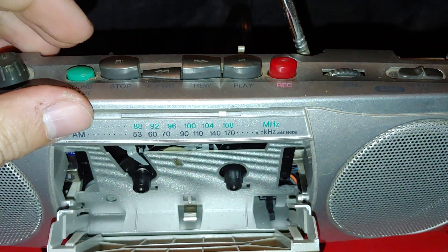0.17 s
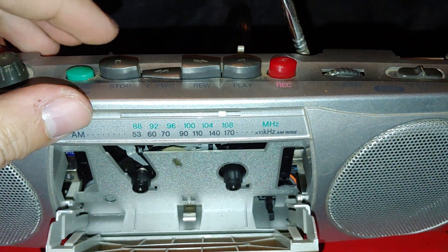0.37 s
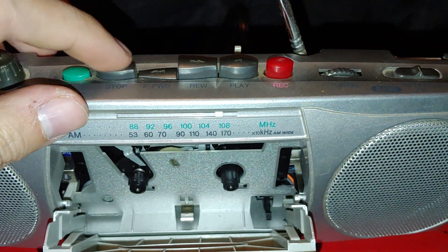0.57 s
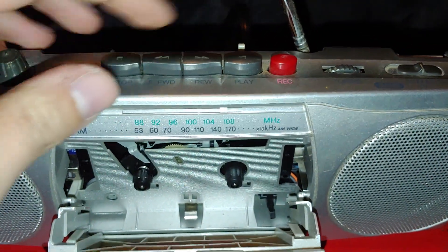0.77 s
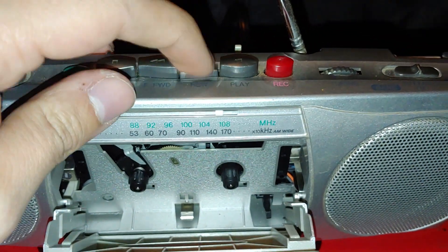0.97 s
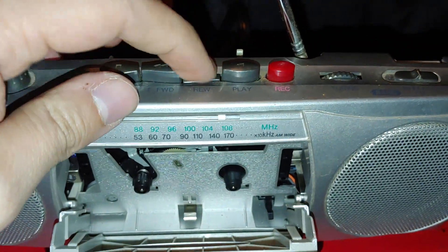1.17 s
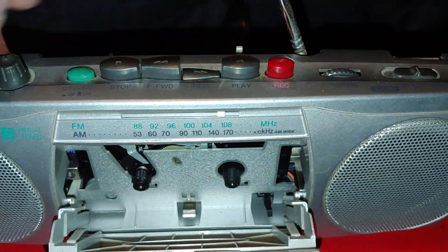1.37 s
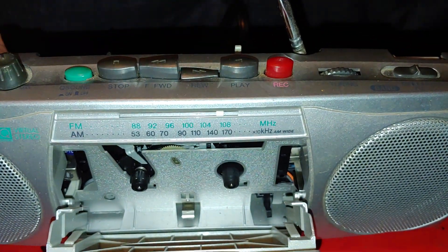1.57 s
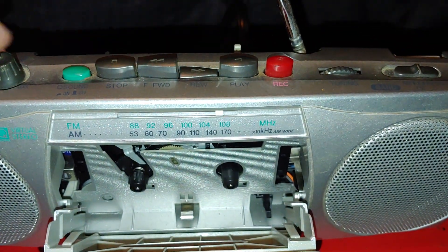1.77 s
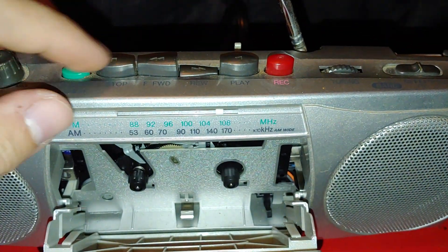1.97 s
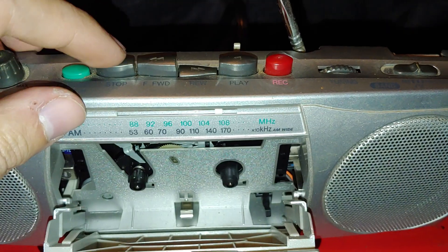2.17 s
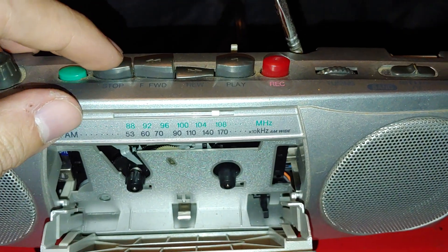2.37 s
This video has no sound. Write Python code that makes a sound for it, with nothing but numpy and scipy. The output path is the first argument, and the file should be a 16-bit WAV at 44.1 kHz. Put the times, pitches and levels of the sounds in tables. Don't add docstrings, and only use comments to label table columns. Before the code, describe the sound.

Cassette player key clicks, close and dry. Quiet hum, mains buzz and soft hiss until a loud bright snap with a low cabinet thump at 0.65 s. A lighter release click follows at 0.8, then a small tick at 1.0 and a heavy clack at 1.06 with rattling and scraping to 1.15. Softer knocks at 1.25 and 1.3, then near quiet, with faint taps around 1.9 and 2.15.

```python
import sys
import numpy as np
from scipy import signal
from scipy.fft import irfft
from scipy.io import wavfile
from scipy.ndimage import uniform_filter1d

SR = 44100
rng = np.random.default_rng(int(sys.argv[2]) if len(sys.argv) > 2 else 0)


def unload_wav(signal):
    wavfile.write(
        sys.argv[1],
        SR,
        np.round(np.clip(np.atleast_2d(signal).T, -1, 1) * 32767).astype(np.int16),
    )


def boost_factor(decibels):
    exponent = np.asarray(decibels, float) / 20
    return 10 ** exponent


N = 106854


def evened(x):
    return x / np.sqrt(np.mean(x ** 2) + 1e-20)


def read(points, hz):
    point_hz, value = np.transpose(points)
    return np.interp(np.log(hz + 1), np.log(point_hz + 1), value)


def add(mix, start_s, sound):
    part = mix[..., round(start_s * SR):][..., :sound.shape[-1]]
    part += sound[..., :part.shape[-1]]


def resonate(x, hz, width_hz):
    b, a = signal.iirpeak(min(hz, SR / 2.2), hz / width_hz, SR)
    return signal.lfilter(b, a, x)


def ringing(modes):
    t = np.arange(SR // 2) / SR
    return sum(boost_factor(db - 60 * t / t60) * np.sin(2 * np.pi * hz * t) for hz, db, t60 in modes)


# pitch in Hz, level in dB per Hz.
HUSH_COLOUR = [(20, -2), (242, -6), (500, -25), (776, -34), (1100, -22), (3950, -26), (6430, -41.5),
               (11000, -33), (13000, -56)]
# pitch in Hz, width in Hz, height in dB (negative for a dip).
HUSH_BUMPS = [(72, 44, 13), (122, 40, 3), (235, 56, -1), (758, 260, 20), (1480, 100, 2.5),
              (6405, 550, -20.5)]
# pitch in Hz, likeness from -1 to 1.
HUSH_LIKENESS = [(60, 1), (360, 0.4), (2130, 0.03), (12600, -0.87)]


def hush():
    level_db, patch_db = -59 + 0.5, 0.73
    hz = np.fft.rfftfreq(2048, 1 / SR)
    a, b, c, d, patches = rng.standard_normal((N // 512 + 5, 1025, 5)).T
    patches = uniform_filter1d(patches, size=14, axis=0)
    patches = evened(uniform_filter1d(patches, size=6, axis=1))
    same = np.clip(read(HUSH_LIKENESS, hz), -1, 1)[:, None]
    left = a + 1j * b
    right = same * left + np.sqrt(1 - same ** 2) * (c + 1j * d)
    bumps_db = sum(db * np.exp(-((hz - f) / width) ** 2 * 2) for f, width, db in HUSH_BUMPS)
    colour_db = (read(HUSH_COLOUR, hz) + bumps_db)[:, None]
    spectrum = np.array([left, right]) * boost_factor(colour_db + patch_db * patches)
    noise = signal.istft(spectrum, nperseg=2048, noverlap=1536)[1][:, :N]
    return boost_factor(level_db) * evened(noise)


def motor():
    level_db, hz = -65, 29.8
    return boost_factor(level_db) * np.sin(2 * np.pi * hz * np.arange(N) / SR)


# pitch in Hz, width in Hz, level in dB.
BUZZ_EVEN = [(121.1, 43, -67.5), (226.3, 40, -68.5), (2420, 650, -92), (3140, 85, -91), (3994, 170, -82.5),
             (4950, 320, -88.5), (5804, 300, -89), (8900, 1900, -100), (10400, 2300, -95)]
# pitch in Hz, width in Hz, level in dB.
BUZZ_ODD = [(723, 170, -77.5), (2570, 400, -92.5), (3800, 140, -86), (9500, 3500, -102)]


def buzz():
    mains_hz, start_s, waver_db = 59.975, 0.005, 1.9
    half = np.arange(int(N / SR * 2 * mains_hz) - 1)
    at = np.round((start_s + half / (2 * mains_hz)) * SR).astype(int)
    size = boost_factor(waver_db * rng.standard_normal(len(half))) * SR / (2 * mains_hz)
    out = np.zeros(N)
    for sign, bands in ((1., BUZZ_EVEN), (-1., BUZZ_ODD)):
        kicks = np.zeros(N)
        kicks[at] = size * sign ** half
        for hz, width, db in bands:
            out += boost_factor(db) * resonate(resonate(kicks, hz, width), hz, width)
    return out


# start in seconds, level in dB.
THUMPS = [(0.387, -54.5), (0.64, -34.5), (0.671, -21), (0.812, -31.5), (0.918, -28.5), (1.038, -30.5),
          (1.063, -17.5), (1.112, -24), (1.122, -20), (1.160, -51), (1.193, -65), (1.218, -32),
          (1.304, -23.5), (1.450, -35), (1.488, -48.5), (1.532, -50)]
# pitch in Hz, level in dB, time to fall 60 dB in seconds.
CABINET_MODES = [(119, -26, 0.045), (160.6, -2.5, 0.33), (188, -1, 0.12), (240.2, -14, 0.37),
                 (333, -21, 0.12), (421, -10, 0.18)]


def cabinet():
    push_s = 0.0041
    push = np.zeros(N)
    u = np.arange(0, 1, 1 / (push_s * SR))
    bump = np.sin(np.pi * u) ** 2 * 2 / len(u)
    for start_s, db in THUMPS:
        add(push, start_s, boost_factor(db) * bump)
    return signal.fftconvolve(push, ringing(CABINET_MODES))[:N]


# start in seconds, time to peak in seconds, level in dB, pitch in Hz.
TICKS = [(.637, .001, -23.5, 4800), (.79, .0012, -15, 6300), (1.243, .002, -42, 4700),
         (1.0095, .002, -26, 4100), (1.927, .002, -41, 1610), (1.927, .002, -49, 550),
         (2.152, .0017, -41, 720), (2.152, .0015, -41, 1070), (1.255, 0.0054, -42, 214.4),
         (1.0655, .0006, -8, 4000), (.8008, .0006, -18, 1400), (.803, .016, -33, 190),
         (.6662, .001, -14, 1900), (.667, .0014, -13.5, 4900), (.666, .0017, -23, 790),
         (.793, .003, -26, 720), (.916, .004, -48, 650), (.95, .01, -47.5, 260)]


def ticks():
    out = np.zeros(N)
    t = np.arange(8192) / SR
    for start_s, rise_s, db, hz in TICKS:
        swell = (t / rise_s * np.exp(1 - t / rise_s)) ** 2
        add(out, start_s, boost_factor(db) * swell * np.sin(2 * np.pi * hz * t))
    return out


def contacts(rows, q, struck):
    rise_share, grit_db, blow, apart = 0.4, 3.5, 0.55, 1
    out = np.zeros((2, N))
    noises = rng.standard_normal((len(rows), 4, 8192))
    for (start_s, length_s, db, hz, *pan_db), noise in zip(rows, noises):
        u = np.arange(8192) / SR / length_s
        if struck:
            shape = np.minimum(u / rise_share, 1) * np.exp(-2 * u ** 2)
        else:
            shape = np.sin(np.pi * np.minimum(u, 1))
        size = np.linalg.norm(shape)
        white = noise[0] + apart * min(hz / 2000, 1) * noise[1:3]
        grit = evened(uniform_filter1d(noise[3], size=24))
        burst = shape * white * boost_factor(grit_db * grit)
        if struck:
            burst[:, np.argmax(shape)] += blow * size
        for wide in (1, 2, 2):
            burst = resonate(burst, hz, wide * hz / q)
        burst *= size / np.linalg.norm(burst, axis=1)[:, None]
        port_db = db + sum(pan_db) * np.array([[.5], [-.5]])
        add(out, start_s, boost_factor(port_db) * burst)
    return out


# start in seconds, rattle length in seconds, level in dB, colour in Hz,
# left minus right in dB.
SNAPS = [(.6375, 0.0026, -30.5, 4750, 1), (.638, 0.0063, -30.5, 8750, 1.5),
         (.6632, 0.0038, -14.5, 3400, 2.5), (.6658, 0.0031, -10, 4700, -0.5),
         (.6665, 0.0037, -3, 7300, 1.5), (.6685, 0.0039, -13.5, 4500, -6), (.787, 0.005, -28, 4000, -2.5),
         (.79, 0.006, -13.5, 4530, 2), (.792, 0.024, -25, 4100, 3), (1.0085, 0.0055, -31, 4300, -8),
         (1.0102, .007, -20.5, 2930, 1.5), (1.033, 0.0068, -31, 3800, -1), (1.0565, 0.0012, -35, 4500, 6.5),
         (1.060, 0.011, -11, 3770, 7), (1.064, .005, -13.5, 3300, 1.5), (1.0645, .005, -16, 9500, 8),
         (1.037, 0.0084, -34.5, 2200, 4.5), (1.241, .008, -42, 3900, 9.5), (2.126, .009, -60, 3500, 4)]


def snaps():
    return contacts(SNAPS, q=1.2, struck=True)


# start in seconds, rattle length in seconds, level in dB, colour in Hz.
KNOCKS = [(.639, 0.0023, -30.5, 1160), (.6662, 0.0055, -13.5, 1850), (.667, 0.0064, -22, 820),
          (.676, 0.0018, -22.5, 1206), (.683, 0.0054, -27.5, 1635), (.7605, 0.006, -42.5, 830),
          (.79, 0.0052, -19, 1100), (.795, 0.0061, -21, 860), (.8008, 0.0022, -17, 1290),
          (.805, 0.0074, -28, 900), (.917, 0.012, -49.5, 644), (1.0118, 0.0068, -31.5, 900),
          (1.0578, 0.0023, -12.5, 900), (1.0652, 0.0048, -12.5, 1554), (1.0705, 0.0023, -18.5, 1286),
          (1.0828, 0.0015, -16.5, 1218), (1.113, .007, -34.5, 1216), (1.124, .007, -34.5, 1800),
          (1.135, 0.00316, -30, 1100), (1.145, 0.0023, -42, 1390), (1.16, 0.0038, -39.5, 900),
          (1.243, 0.007, -31.5, 1470), (1.302, 0.0054, -44, 669), (1.45, 0.0034, -60, 663)]


def knocks():
    return contacts(KNOCKS, q=1.35, struck=True)


# start in seconds, length in seconds, level in dB, colour in Hz.
SCRAPES = [(.640, 0.029, -37.5, 3420), (.648, .02, -52, 8030), (.67, 0.093, -44, 4300),
           (.755, 0.012, -45, 2900), (.772, 0.031, -40, 3830), (.99, 0.053, -71.5, 2500),
           (.995, 0.017, -54, 900), (1.07, 0.093, -45, 2513), (1.105, 0.064, -43.5, 1440),
           (1.085, 0.069, -47, 5270), (1.10, 0.056, -42, 450), (1.25, 0.052, -60, 2880),
           (2.115, 0.039, -63.5, 820), (.66, 0.049, -43.5, 506)]


def scrapes():
    return contacts(SCRAPES, q=0.8, struck=False)


# pitch in Hz, level in dB, time to fall 60 dB in seconds.
STOP_KEY = [(440, -9.5, 0.033), (637, -1.5, .07), (838, 1.5, 0.12), (996, 3, 0.054), (1475, -3, 0.062),
            (1710, -1, 0.04), (1850, 0, .025), (2350, 2, .045), (2860, -5, .02), (3143, -1, 0.019),
            (3640, -3, 0.016), (4100, 6, .02), (4900, 6, 0.018), (7350, 3.5, 0.026)]
# pitch in Hz, level in dB, time to fall 60 dB in seconds.
KEY_UP = [(450, -20, .04), (702, -2, .045), (900, -7.5, 0.031), (1160, -14.5, 0.045), (1320, -17.5, .06),
          (1620, -5, 0.15), (1950, -9, .035), (2460, 3, 0.043), (3286, -19, .05), (4120, -13, 0.064),
          (4350, -10, 0.055), (4750, 4.5, 0.031), (5520, -10, .04), (7790, -4, .02)]
# pitch in Hz, level in dB, time to fall 60 dB in seconds.
WIND_KEY = [(422, -8, 0.06), (718.5, -6.5, 0.037), (837, 2.5, 0.053), (1100, -15.5, 0.069),
            (1290, -11, 0.041), (1482, -5.5, 0.0328), (1771, 3.5, 0.045), (2064, 6, 0.024),
            (2590, 10, 0.015), (3310, -7, .03), (3913, 2.5, 0.012), (4230, -4, 0.028), (5080, -0.5, .018),
            (8500, -6.5, .02)]


def shell(x):
    ring_db, key_up_s, wind_s = -8.5, 0.75, 0.96
    key = np.digitize(np.arange(N) / SR, [key_up_s, wind_s])
    ring = np.zeros((2, N))
    for k, modes in enumerate((STOP_KEY, KEY_UP, WIND_KEY)):
        answer = ringing(modes)[None]
        answer = answer / np.linalg.norm(answer)
        ring += signal.fftconvolve(x * (key == k), answer, axes=1)[:, :N]
    return boost_factor(ring_db) * ring


# start in seconds, length in seconds, level in dB, colour in Hz.
SLIPS = [
    (.81, 0.05, -48.5, 260),
    (1.09, 0.062, -35, 196),
    (1.17, 0.1, -58, 720),
    (1.46, 0.115, -57.5, 165.5),
    (1.835, 0.15, -65, 4065),
    (1.885, .055, -63, 3900),
]


def slips():
    return contacts(SLIPS, q=2.34, struck=False)


def keys():
    direct = snaps() + knocks() + scrapes()
    return direct + shell(direct) + slips()


# pitch in Hz, time to fall 60 dB in seconds.
ROOM_DECAY = [(300, 0.3), (1000, 0.14), (3000, 0.12), (6000, 0.063), (11000, 0.12)]


def room(x):
    level_db = -13
    taps = np.zeros((2, SR // 2))
    slots = np.arange(200, SR // 2 - 20, 20)
    at = slots + rng.integers(0, 20, (2, len(slots)))
    np.put_along_axis(taps, at, rng.choice([-1., 1.], at.shape), 1)
    hz, t, z = signal.stft(taps, SR, nperseg=256)
    fade = boost_factor(-60 * t / read(ROOM_DECAY, hz)[:, None])
    tail = signal.istft(z * fade, SR, nperseg=256)[1]
    tail = tail / np.linalg.norm(tail[0])
    return boost_factor(level_db) * signal.fftconvolve(x[None], tail, axes=1)[:, :N]


# pitch in Hz, level in dB.
PORTS = [(70, -22), (130, -1.5), (3000, 1), (5600, 0), (6500, -8), (7400, -3), (11500, -2), (12400, -26.5)]
# pitch in Hz, left minus right in dB.
FAR_LEAN = [(700, 0), (1000, -4.5), (1500, -15), (2100, -1.5), (3000, 4), (4600, 17.5), (6000, 18.5),
            (8000, 4.5)]
# pitch in Hz, left minus right in dB.
NEAR_LEAN = [(60, 1), (150, 0.5), (360, -0.5), (870, -0.5), (2130, -5), (5190, 9.5), (12600, 1)]
# pitch in Hz, delay in seconds.
RIGHT_LATE = [(700, 0.000023), (1500, 0.0002447)]


def ports(x, lean, flat=0, table=FAR_LEAN):
    hz = np.fft.rfftfreq(2048, 1 / SR)
    balance_db = lean * np.outer([.5, -.5], read(table, hz))
    logs = np.log(boost_factor((1.5 - flat) * read(PORTS, hz) + balance_db))
    full = np.concatenate([logs, logs[:, -2:0:-1]], 1)
    early = np.conj(signal.hilbert(full))[:, :1025]
    late = np.outer([0, 1], 2 * np.pi * hz * read(RIGHT_LATE, hz))
    taps = np.roll(irfft(np.exp(early - 1j * late)), 128, 1)
    return signal.fftconvolve(x * np.ones((2, 1)), taps, axes=1)[:, 128:N + 128]


def scene():
    hand = keys()
    far = ports(buzz() + room(hand.mean(0)), 0.65)
    noise = ports(hush(), 1.0, flat=1.0)
    near = ports(hand + cabinet() + ticks(), 1, table=NEAR_LEAN)
    return near + far + noise + motor()


def roll_off(x):
    return signal.sosfilt(signal.butter(12, 13250, fs=SR, output="sos"), x)


def record(dry):
    duck_from_db, duck_share, treble_duck, recover_db_per_s = -32.5, 0.13, 0.36, 60
    ceiling, edge_hz = 0.8, 12700
    power = uniform_filter1d((dry ** 2).mean(0), size=400)
    power_db = 10 * np.log10(abs(power) + 1e-12)
    fall = np.arange(N) * recover_db_per_s / SR
    held_db = np.maximum.accumulate(power_db + fall) - fall
    over_db = np.maximum(held_db - duck_from_db, 0)
    late_db = np.roll(uniform_filter1d(over_db, size=1800), 1400)
    low = signal.oaconvolve(dry, signal.firwin(255, 3500, fs=SR)[None], "same")
    treble = (dry - low) / boost_factor(treble_duck * late_db)
    ducked = (low + treble) / boost_factor(duck_share * late_db)
    rounded = ceiling * np.tanh(ducked / ceiling)
    edge = signal.firwin(255, edge_hz, window=("kaiser", 9), fs=SR)[None]
    mix = signal.oaconvolve(rounded, edge, "same")
    return roll_off(mix)


dry = scene()
out = record(dry)
unload_wav(out)
```